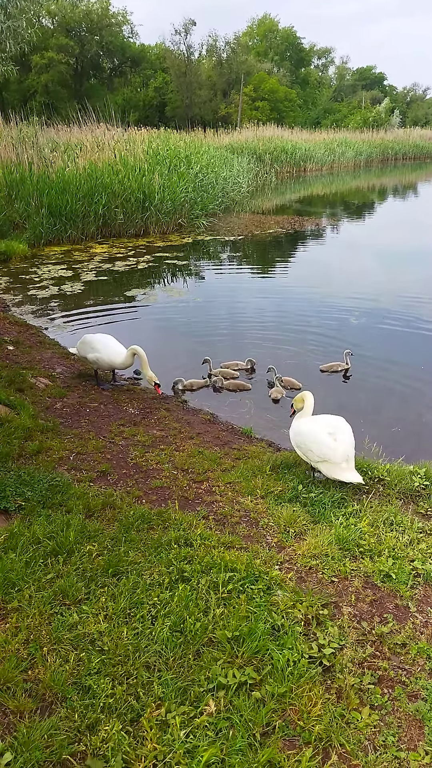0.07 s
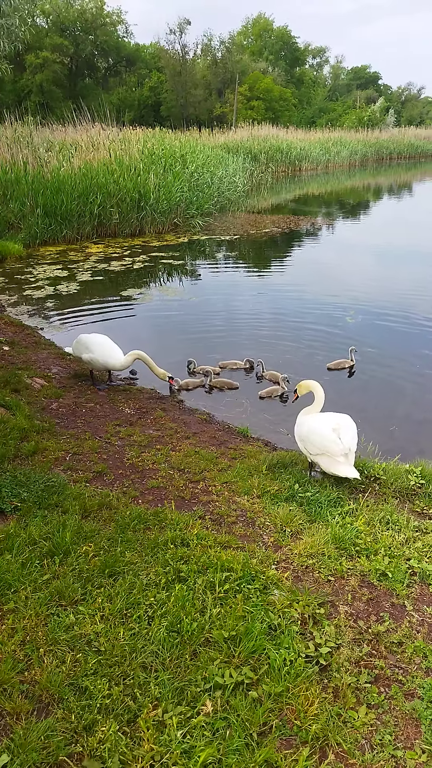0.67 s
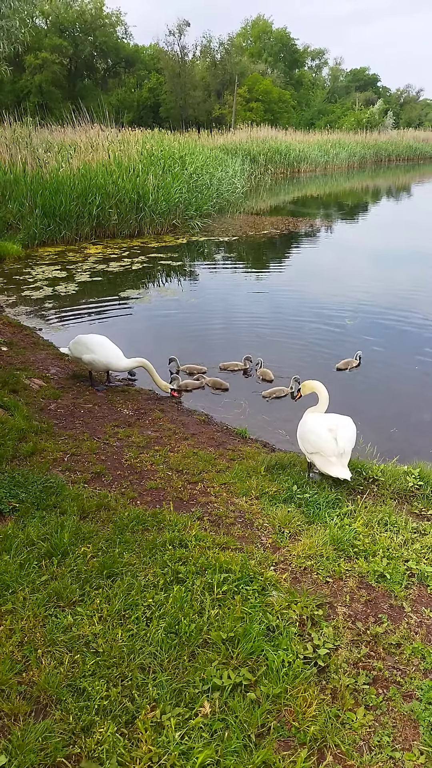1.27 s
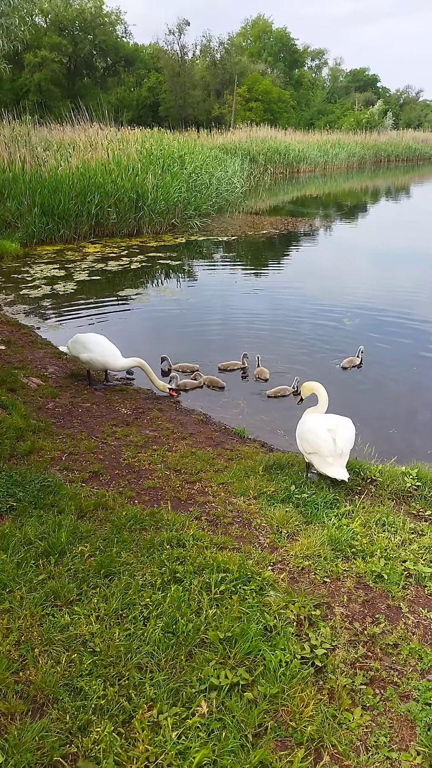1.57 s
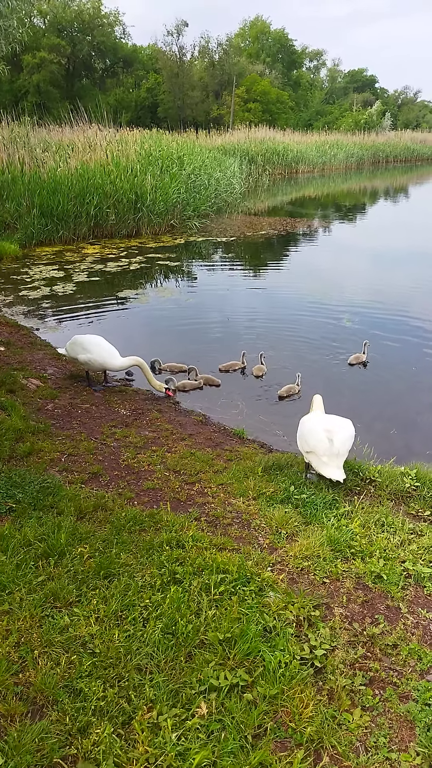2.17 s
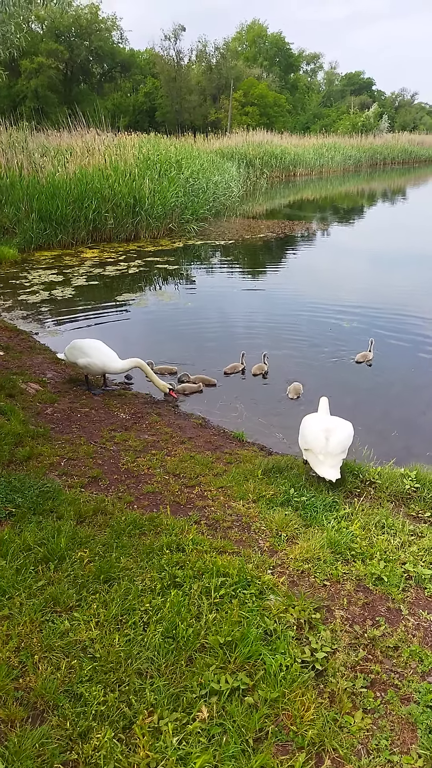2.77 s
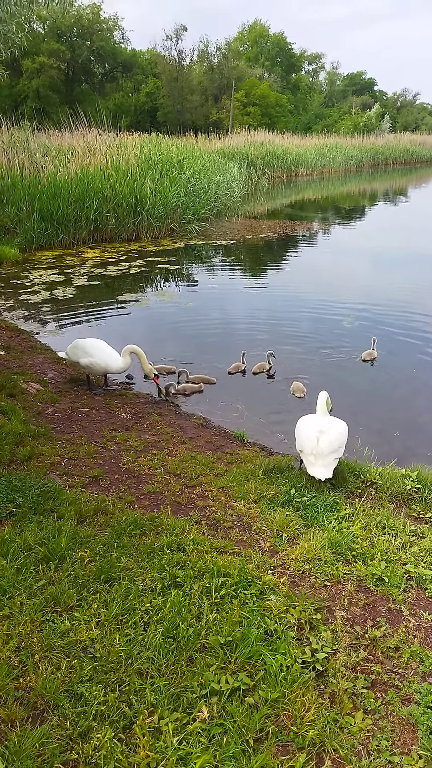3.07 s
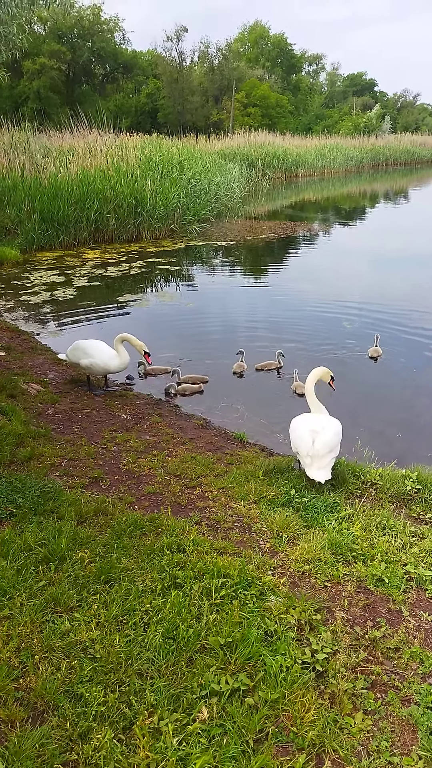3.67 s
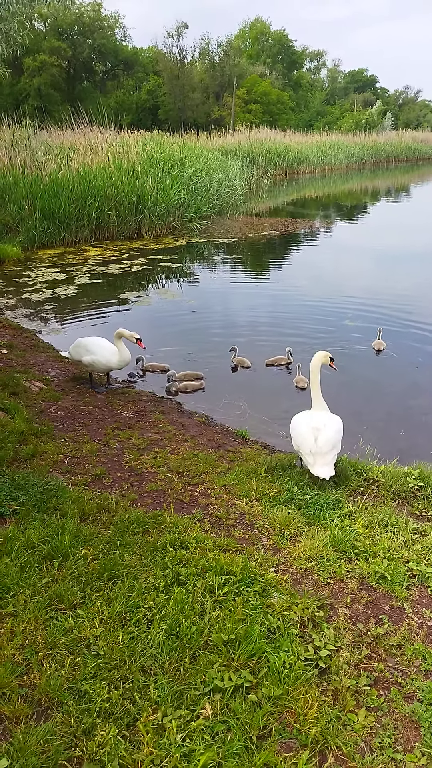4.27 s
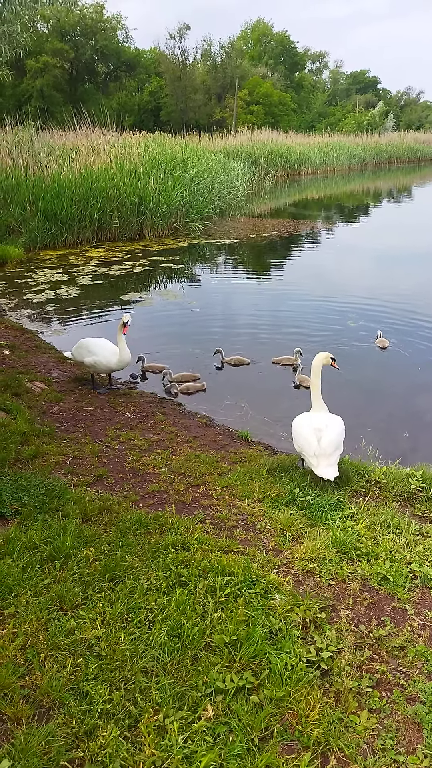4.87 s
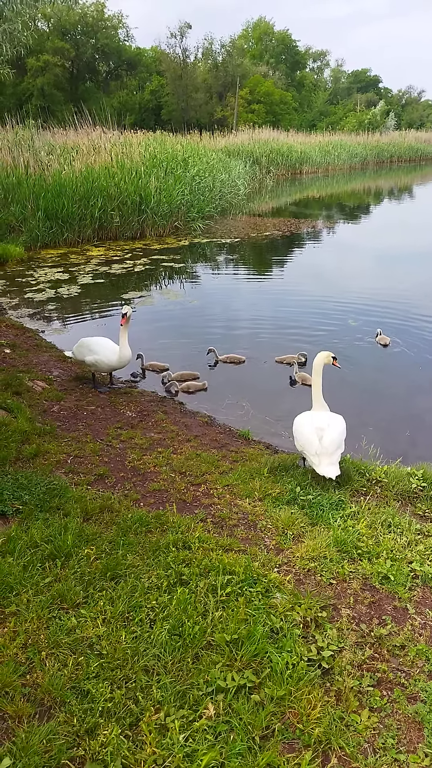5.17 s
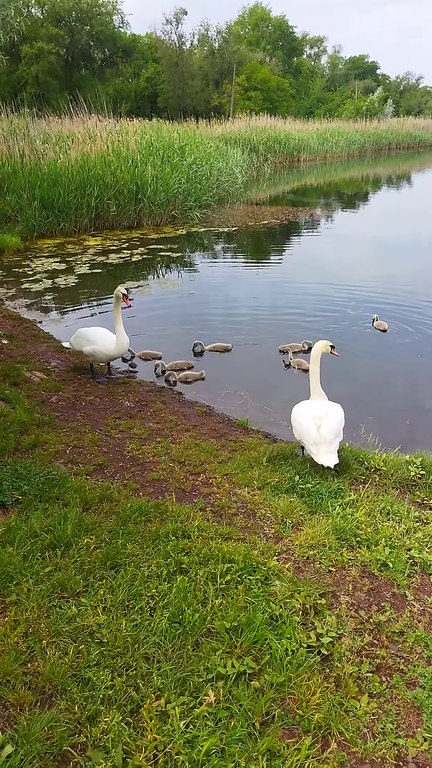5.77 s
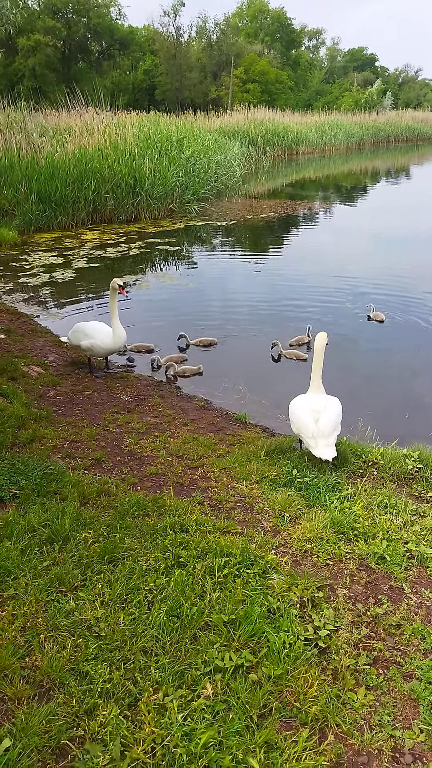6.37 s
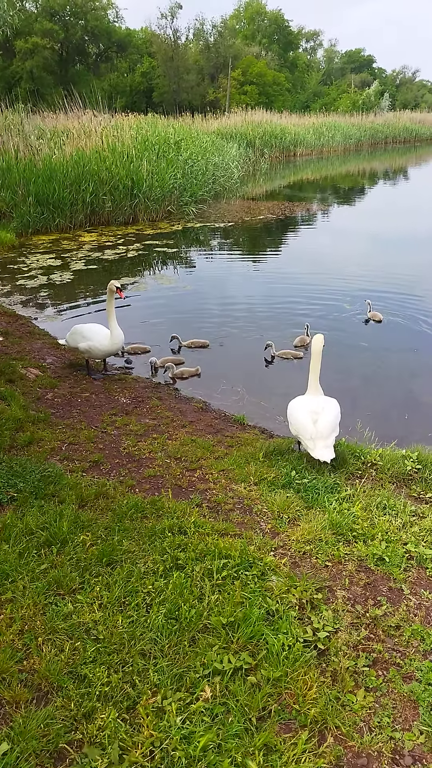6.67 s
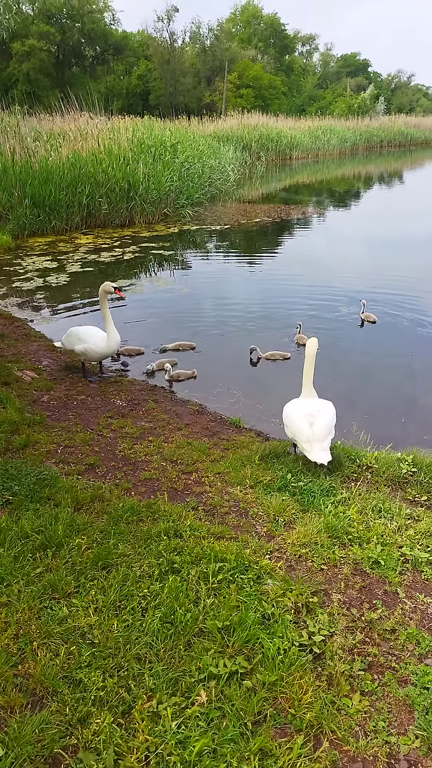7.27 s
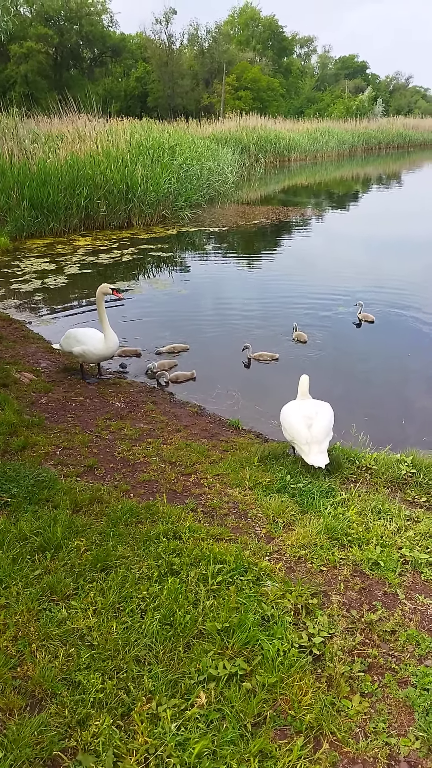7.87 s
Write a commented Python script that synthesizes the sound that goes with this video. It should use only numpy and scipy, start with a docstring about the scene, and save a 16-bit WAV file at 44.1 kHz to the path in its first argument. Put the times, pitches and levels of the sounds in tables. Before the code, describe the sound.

Swans and cygnets rasp, peep and whistle softly while dabbling in shallow water, with light wind on the microphone.

```python
"""Swans feeding at a pond

Swans and their cygnets feed by the reeds, a few metres away. The cygnets push air through
their voice boxes to whistle, peep and squeak, and dry rasps of rattling air answer. Bills tick
and drip in the shallows and stir up ringing bubbles. Birds wheeze far off, the trees give
a faint echo, and puffs of wind hit each side of the microphone over a low rumble."""
import sys
import numpy as np
from scipy import signal
from scipy.fft import rfft, irfft, next_fast_len
from scipy.io import wavfile
from scipy.ndimage import uniform_filter1d, map_coordinates

SR = 44100
rng = np.random.default_rng(int(sys.argv[2]) if len(sys.argv) > 2 else 0)


def persist_wave(psi):
    """Save psi, clipped to +-1, as 16-bit WAV."""
    counts = np.round(np.clip(psi, -1, 1) * 32767).astype(np.int16)
    wavfile.write(sys.argv[1], SR, np.atleast_2d(counts).T)


N = 349713

# How the throat boosts or weakens each overtone: frequency_hz, gain_db
THROAT_TONE = [(1500, -20), (2900, 7), (3800, 2), (4500, -8), (5750, -18), (7600, -46), (9500, -32),
               (11500, -28.5), (13400, -37), (16000, -60)]
# The tone of air hissing through the bill: frequency_hz, gain_db
HISS_TONE = [(3500, 1.5), (4500, 16), (5600, 6), (7200, -44.5), (8500, 6), (10700, 8.5), (12000, -8.5),
             (15000, 2.5)]
# One cygnet whistle a row (the base is the lowest tone, under the overtones):
# start_s, length_s, top_pitch_hz, fall_share, overtone_level_db, base_level_db, left_delay_ms
WHISTLE_NOTES = [(0.472, 0.063, 2037, .2, -64, -67.5, .55), (0.582, .06, 2075, 0.215, -60, -68.5, 0.53),
                 (.782, 0.07, 2062, 0.18, -62.5, -68.5, 0.51), (0.885, 0.069, 2080, 0.24, -63, -70, .55),
                 (3.275, 0.037, 1975, 0.024, -53.5, -80, -0.086),
                 (3.408, .055, 2003, .03, -52.5, -77, -0.084), (5.217, 0.02, 1860, 0.17, -47, -69, -.125),
                 (5.445, .108, 1908, 0.15, -40, -66, -.44), (5.578, 0.11, 1923, 0.162, -42.5, -69, -0.439),
                 (5.848, 0.1, 1926, .17, -41.5, -66, -0.45), (5.981, 0.11, 1918, .13, -45.5, -71.5, -0.45),
                 (6.267, .11, 1935, 0.21, -41.5, -69.5, -0.44),
                 (6.403, .108, 1936, 0.063, -44.5, -73.5, -0.44)]


def whistles():
    """The throat rings an octave above the base. Returns the near sound and the part sent to the trees."""
    near, thrown = np.zeros((2, 2, N))
    for start_s, length_s, top_hz, fall, db, base_db, lag_ms in WHISTLE_NOTES:
        effort = np.clip((db + 53) / 9, 0, 1)  # hard calls swoop up; soft ones only fall
        steep = 5 * min(length_s / .06, 1)
        hz, phase, swell = voice_box(length_s, top_hz, .21 * effort, fall, steep, jitter=.0044)
        u = ramp(length_s)
        n = len(u)
        edge = (2 * u - 1) ** 2  # 1 at both ends, 0 in the middle
        weak_ends = effort / (1 + (np.minimum(u, 1 - u) / .13) ** 6)
        drift = .00587 * wobble(23.3, n) + .0042 * wobble(171, n)
        drift += .03 * weak_ends * wobble(900, n)  # low pressure makes the voice rough
        phase = phase + 2 * np.pi * np.cumsum(hz * drift) / SR
        air = amp(-23.5) * noise(resonance(3630, 740), n) + amp(-29.5) * noise(tone(HISS_TONE), n)
        air += amp(-26) * wobble(702, n) * np.sin(2 * phase)  # noise clings to the octave
        air *= np.sqrt(swell) * amp(10 * edge)
        pressure = np.sqrt(swell) * amp(-7 * weak_ends)
        voice = pressure * overtones(hz, phase, THROAT_TONE, dull_db=.4 * edge) + air
        base = pressure * np.sqrt(2) * np.sin(phase)
        add(near, start_s, amp(db) * voice + amp(base_db) * base, lag_ms, pan_db=11 * lag_ms)
        add(thrown, start_s, amp(-50.5 + 6 * effort ** 2) * (voice + amp(10) * air))
    return near, thrown


# Soft calls for keeping in touch: start_s, length_s, top_pitch_hz, bend_share, level_db
PEEP_NOTES = [(0.04, 0.11, 4400, 0.042, -70), (0.361, 0.088, 2240, .07, -69),
              (0.425, 0.057, 3040, .08, -65.5), (0.867, .075, 813, 0.062, -66.5),
              (1.019, 0.082, 2540, 0.14, -66), (1.47, 0.072, 2050, 0.062, -64),
              (1.715, 0.062, 1985, 0.07, -64.5), (1.78, 0.088, 2440, 0.17, -62.5),
              (1.934, 0.097, 2810, 0.24, -61.5), (2.112, 0.07, 2810, .19, -67),
              (2.296, 0.058, 2670, .17, -67), (2.852, 0.075, 2009, 0.116, -61.5),
              (3.048, .062, 1900, 0.053, -64), (5.314, 0.042, 2210, 0.096, -63.5),
              (5.434, 0.036, 2170, 0.057, -64)]


def peeps():
    """Scratchy little notes that climb slowly and drop quickly."""
    out = np.zeros((2, N))
    for start_s, length_s, top_hz, bend, db in PEEP_NOTES:
        hz, phase, swell = voice_box(length_s, top_hz, bend, .83 * bend, 1.705, jitter=.008, late=1.3)
        scratch = amp(-11) * noise(resonance(top_hz, .27 * top_hz), len(hz))
        add(out, start_s, amp(db) * swell * (np.sin(phase) + scratch), lag_ms=-.04)
    return out


# How a nearly closed bill shapes the overtones: frequency_hz, gain_db
BILL_TONE = [(1500, -29), (3000, -5), (4450, -2.5), (5900, -10), (7400, -6), (9000, -21), (10500, -16),
             (12000, -4.5), (13500, -16), (15000, -32)]
# One squeak a row: start_s, length_s, top_pitch_hz, fall_share, level_db, dulling_db_per_overtone
SQUEAK_NOTES = [(3.215, 0.075, 1510, 0.025, -68, 1.5), (3.365, 0.065, 1530, 0.016, -66, 2),
                (5.17, 0.034, 1425, 0.087, -62, 1), (5.199, .024, 1490, .05, -55, 0.8),
                (5.233, 0.047, 1496, 0.014, -59.5, -0.37)]


def squeaks():
    """Thin notes through a nearly closed bill, flicking down at the end."""
    out = np.zeros((2, N))
    for start_s, length_s, top_hz, fall, db, dull_db in SQUEAK_NOTES:
        hz, phase, swell = voice_box(length_s, top_hz, rise=.0067, fall=fall, steep=2.9, jitter=.0046)
        air = amp(-8) * noise(resonance(4500, 2200), len(hz))
        voice = overtones(hz, phase, BILL_TONE, dull_db) + air
        add(out, start_s, amp(db) * swell * voice, lag_ms=-.2)
    return out


def voice_box(length_s, top_hz, rise, fall, steep, jitter, late=1):
    """Air pressure lifts a note's pitch and loudness together; late above 1 delays the top pitch."""
    u = ramp(length_s)
    n = len(u)
    slack = np.abs(2 * u - 1)
    lean = 2 * u ** late - 1
    droop = np.where(lean < 0, rise, fall) * np.abs(lean) ** steep
    droop += .0395 * np.maximum(u - .45, 0)  # the pitch sags as air runs out
    hz = top_hz * (1 - droop + jitter * (wobble(581, n) + wobble(81.8, n)))
    flicker_db = (1 + 2 * slack ** 2) * wobble(235, n)
    swell = amp(-10 * slack ** 5 + flicker_db) * np.clip(14 * (1 - slack), 0, 1)
    return hz, 2 * np.pi * np.cumsum(hz) / SR, swell


def overtones(hz, phase, body, dull_db):
    """Tones at 2 to 9 times the pitch, shaped by the throat or bill; the upper ones flicker."""
    out = np.zeros(len(hz))
    for k in range(2, 10):
        flicker_db = (k > 2) * 2 * wobble(144, len(hz))
        out += amp(along(body, k * hz) + flicker_db - (k - 2) * dull_db) * np.sin(k * phase)
    return np.sqrt(2) * out


# Runs of dry rasps: start_s, rasp_count, spacing_s, length_s, level_db, force_0_to_1, pips_per_rasp
RASP_RUNS = [(.008, 1, 0, 0.028, -55, 0, 0), (.131, 1, 0, 0.077, -51, 0, 0),
             (0.226, 2, .055, 0.027, -53, 0.26, 0), (1.158, 2, .15, 0.059, -52, 0.2, 0),
             (1.517, 2, .157, 0.063, -53, 0.28, 0), (3.679, 2, .148, 0.026, -47.5, 0.77, 2),
             (4.066, 2, .143, 0.034, -48.5, 0.86, 2), (4.413, 1, 0, 0.15, -49.5, 0.62, 0),
             (4.639, 1, 0, .15, -48.5, .78, 0), (4.889, 1, 0, 0.15, -48, 0.79, 0),
             (5.392, 1, 0, 0.026, -55.5, 0.9, 0), (6.215, 1, 0, 0.027, -57.5, 0.97, 0)]


def rasps():
    """Rasps come alone or in pairs; tiny pips lead into some of the short ones."""
    out = np.zeros((2, N))
    for first_s, count, spacing_s, length_s, db, force, pips in RASP_RUNS:
        for start_s in first_s + spacing_s * np.arange(count):
            call = amp(db) * rasp(length_s, force)
            out[:, round(start_s * SR):][:, :call.shape[1]] += call
            for k in range(pips):  # earlier pips are weaker
                _, phase, swell = voice_box(.012, 2680, rise=.1, fall=.042, steep=.97, jitter=.0093)
                add(out, start_s - .016 - .0207 * k, amp(db - 7 - 8 * k) * swell * np.sin(phase))
    return out


def rasp(length_s, force):
    """Air rattles through the throat in uneven puffs; force deepens the rattle and raises its ring."""
    u = ramp(length_s)
    n = len(u)
    out = np.zeros((2, n))
    centre_hz, puffs_per_s, puff_fade_db = 2432 + 641 * force, 86, 5 + 5 * force
    cycle = np.cumsum(puffs_per_s * np.exp(.25 * wobble(90, n))) / SR
    sizes_db = 2.5 * rng.standard_normal(64)[cycle.astype(int)]
    rattle = unit(uniform_filter1d(amp(sizes_db - puff_fade_db * (cycle % 1)), size=40))
    arch = np.abs(np.sin(np.pi * u))
    flow = rattle * arch ** (.12 + .25 * force)
    ring_hz = centre_hz * (1 + .1 * (u - .5) + .025 * wobble(54.2, n))  # climbs and wanders
    grain = wobble(380, n) + 1j * wobble(380, n)  # blurs the ring into a narrow band of noise
    ring = unit(np.real(grain * np.exp(2j * np.pi * np.cumsum(ring_hz) / SR)) * np.sqrt(arch))
    swell_db = 40 * length_s * (2 * arch ** 2 - 1.4)  # longer rasps swell more in the middle
    ring *= amp(swell_db - 2 - 10.5 * (1 - force))
    low_cut = lambda f: 1 + (.69 * centre_hz / (f + 1)) ** 8
    high_cut = lambda f: 1 + (f / (1.38 * centre_hz)) ** 20
    breath = amp(-6.5) * noise(lambda f: 1 / np.sqrt(low_cut(f) * high_cut(f)), n)
    add(out, 0, flow * (ring + breath), lag_ms=-.04 - .18 * force)
    for pan_db in (-20, 20):  # part scatters off the water, differently to each side
        hiss = amp(-36.5 + 12.5 * force) * noise(tone(HISS_TONE), n)
        scatter = amp(-18) * noise(resonance(centre_hz, 900), n)
        add(out, 0, flow * (hiss + scatter), pan_db=pan_db)
    return out


# The clearest ticks of bills in the water: start_s, peak_db, pitch_hz, crack_share_db
BILL_SPLASHES = [(0.123, -45.5, 2333, -2), (0.1866, -46, 2390, -2.5), (.661, -40.5, 4130, .5),
                 (.738, -42, 4800, 2), (.963, -50.5, 3000, -11), (1.12, -45, 9600, -6),
                 (1.245, -46.5, 2780, -2), (1.9148, -49.5, 920, -5), (2.096, -46, 2500, -4),
                 (2.201, -50, 1140, -12), (2.4932, -45.5, 3270, .5), (2.888, -53, 1740, -24),
                 (3.036, -44, 1940, -2.5), (4.0174, -45.5, 2765, 0), (5.333, -52.5, 7240, -7),
                 (7.3558, -48.5, 3280, -15), (7.4091, -42.5, 2800, -1), (7.749, -45.5, 2980, 0),
                 (7.87, -44, 12300, -2), (7.899, -44, 12400, -3)]


def dabbling():
    """Bills nibble at the water's edge and shed droplets, among fainter drips; then they churn bubbles."""
    out = np.zeros((2, N))
    lowest_drip_hz, churn_start_s, churn_length_s = 1310, 7.33, .57
    for start_s, db, hz, crack_db in BILL_SPLASHES:
        pan_db = rng.normal(-1.6, 4.3)
        add(out, start_s, amp(db) * splash(hz, crack_db), pan_db=pan_db)
        for wait, pitch, size in rng.random((2, 3)):
            droplet = amp(db - 10.5 - 3.7 * size) * splash(lowest_drip_hz * 8 ** pitch, crack_db=-6)
            add(out, start_s - .03 * np.log(1 - wait), droplet, pan_db=pan_db)
    for when, pitch, size, side in rng.random((110, 4)):
        start_s = when * N / SR
        range_db = 9.5 if start_s < 3.1 else 4.75  # drips soften when the feeding eases
        drip = splash(lowest_drip_hz * 8 ** pitch, -9 * (1 - pitch))  # higher drips crack more
        add(out, start_s, amp(-57 + range_db * size ** 3) * drip, lag_ms=.12 * (side - .5))
    t = np.arange(SR // 16) / SR
    for when, pitch, size, side in rng.random((70, 4)):
        hz = 1860 * np.exp(.2 * np.arctanh(1.99 * (pitch - .5)))
        bubble = np.sin(2 * np.pi * hz * t * (1 + t))  # the pitch rises as it surfaces
        bubble *= fade(t, .094) * (1 - np.exp(-t / .0003))
        spray = amp(8.5) * splash(12000, crack_db=-9)
        churn = amp(-71.5 + 7.2 * size ** 2) * (bubble + spray)
        add(out, churn_start_s + churn_length_s * when, churn, lag_ms=.067 * (side - .5))
    return out


# The tone of a small splash's sharp crack: frequency_hz, gain_db
CRACK_TONE = [(1500, -14), (4000, 6.5), (7000, 5), (9500, 6.5), (15000, 1.5)]


def splash(hz, crack_db):
    """A tiny splash with a peak of 1: a sharp crack and a brief ring that lasts longer when low."""
    t = np.arange(SR // 16) / SR
    ring = noise(resonance(hz, 500 + .3 * hz), len(t)) * fade(t, .015 * (2800 / hz) ** .45)
    crack = noise(tone(CRACK_TONE), len(t)) * fade(t, .006)
    share = min(amp(crack_db), .97)
    x = np.sqrt(1 - share ** 2) * ring + share * crack
    return x / np.abs(x).max()


# Plops and ringing bubbles: start_s, peak_db, pitch_hz, fade_s
BUBBLE_PLOPS = [(1.4168, -41.5, 2690, 0.012), (7.337, -56, 1800, .03), (7.417, -47.5, 2560, 0.015),
                (7.439, -57, 976, 0.047), (7.55, -48, 2110, 0.017), (7.63, -55, 1850, .06),
                (7.656, -51, 2110, 0.021), (7.698, -60.5, 2240, 0.088), (7.715, -61, 1695, .13),
                (7.821, -58, 1920, 0.11), (7.849, -42, 2380, 0.012)]


def plops():
    """Trapped air rings and climbs in pitch as it surfaces, short plops fastest."""
    out = np.zeros((2, N))
    t = np.arange(SR // 8) / SR
    for start_s, db, hz, fade_s in BUBBLE_PLOPS:
        ring = np.sin(2 * np.pi * hz * t * (1 + .0043 * t / fade_s ** 2))
        ring *= fade(t, fade_s) * (1 - np.exp(-t / .00016))
        add(out, start_s, amp(db) * ring / np.abs(ring).max())
    return out


# Wheezes of far birds: start_s, length_s, pitch_hz, width_hz, relative_level_db
FAR_WHEEZES = [(0.454, 0.12, 4600, 696, -74), (0.529, 0.17, 4200, 900, -71.5),
               (1.342, 0.27, 4050, 604, -80), (2.376, 0.39, 3900, 1140, -80),
               (2.846, 0.36, 2320, 300, -78.5), (3.831, 0.1, 4750, 2200, -75.5),
               (5.675, 0.27, 3820, 1320, -66.5), (5.745, 0.086, 6440, 887, -76.5)]


def far_birds():
    """Distant wheezy notes: a band of noise swells and fades, separately on each side."""
    out = np.zeros((2, N))
    for start_s, length_s, hz, width_hz, db in FAR_WHEEZES:
        u = ramp(length_s)
        swell = amp(db - 1.5) * np.abs(np.sin(np.pi * u ** .88)) ** .51
        for lag_ms, pan_db in ((-.25, -22), (-.1, 23.5)):
            add(out, start_s, swell * noise(resonance(hz, width_hz), len(u)), lag_ms, pan_db)
    return out


# The tone of wind on the microphone at a speed of 1 (slower is darker): frequency_hz, gain_db
WIND_TONE = [(20, -64), (35, -31), (60, -13), (100, 2.5), (150, 1.5), (250, -6), (380, -20.5), (520, -33.5),
             (1200, -94)]
# The breeze over time: time_s, level_db, left_minus_right_db
BREEZE_LEVELS = [(.1, -74, -2), (.42, -51.5, -11.5), (.9, -51.5, 6.5), (1.15, -57, -17), (1.7, -56.5, 1.5),
                 (1.85, -77.5, 6), (5.85, -69.5, 7), (6.449, -41, 15.5), (7.05, -45.5, -17),
                 (7.62, -48, -11), (7.88, -67, -2)]
# The strongest puffs: middle_s, loud_part_s, relative_level_db, side (0 left, 1 right)
WIND_PUFFS = [(.385, 0.028, -44, 1), (.439, 0.019, -38.5, 1), (.669, 0.019, -38, 0),
              (.822, 0.021, -41.5, 0), (.888, 0.044, -44, 1), (1.129, 0.023, -44, 1),
              (6.015, 0.037, -41.5, 1), (6.264, 0.035, -24, 0), (6.419, 0.055, -35, 1),
              (6.505, 0.054, -35, 0), (6.585, 0.0204, -35.5, 0), (6.849, 0.057, -33, 1),
              (6.931, 0.025, -35, 0), (7.245, .04, -40, 1), (7.581, 0.055, -37, 0)]


def wind():
    """Two lumpy gusts veer across the microphone; single puffs hit one side, brighter when stronger."""
    times_s, levels_db, leans_db = np.transpose(BREEZE_LEVELS)
    level_db, lean_db = over_time(times_s, levels_db), over_time(times_s, leans_db)
    out = np.zeros((2, N))
    for side, sign in enumerate((1, -1)):
        breeze = noise(tone(WIND_TONE, speed=.86), N)
        lumps = amp(6 * np.minimum(wobble(22), 1.5))  # swirls within the breeze
        out[side] = amp(level_db + sign * lean_db / 2) * unit(breeze * lumps)
    for middle_s, loud_part_s, db, side in WIND_PUFFS:
        u = ramp(1.6 * loud_part_s)
        rush = noise(tone(WIND_TONE, speed=amp(.21 * (db + 33))), len(u))
        puff = unit(rush * np.sin(np.pi * u) ** 2)
        slot = out[side, round(middle_s * SR) - len(u) // 2:][:len(u)]
        slot += amp(db - .5) * puff[:len(slot)]
    return out


# The tone of still outdoor air: frequency_hz, gain_db
AIR_TONE = [(25, -50), (45, -28), (77, -11), (117, 0.5), (187, -10.5), (546, -19), (1500, -25),
            (2700, -27.5), (4300, -29), (6500, -35), (7100, -41.5), (11500, -36.5), (15500, -38)]
# The tone of rustling reeds: frequency_hz, gain_db
REED_TONE = [(900, -12.5), (1700, -1.5), (2500, 3), (4200, -2), (5400, -26), (8000, -15.5)]
# How loudly the reeds rustle: time_s, level_db
REED_LEVELS = [(0, -69), (1.5, -69.5), (2.1, -70.5), (4, -69.5), (5.7, -69), (6.9, -80), (7.93, -69.5)]


def background():
    """Reeds stir in the quiet air while a low, far-off rumble swells and fades."""
    reeds = amp(over_time(*np.transpose(REED_LEVELS)) + 1.4 * wobble(9)) * outdoor_noise(REED_TONE)
    swell = amp(over_time([2, 3.5, 5.5], [-69, -62, -66]))
    rumble = np.array([noise(resonance(141.6, 47), N) for side in range(2)])
    return amp(-61.5) * outdoor_noise(AIR_TONE) + swell * rumble + reeds


# How alike left and right sound: frequency_hz, likeness (1 the same, 0 unrelated, -1 opposite)
SIDE_LIKENESS = [(100, 1), (500, 0.43), (2000, -0.16), (4000, -0.15), (12000, -0.033)]


def outdoor_noise(colour):
    """Noise from all around; its lowest tones reach both sides alike."""
    turn = lambda f: np.arccos(along(SIDE_LIKENESS, f)) / 2
    gains = lambda f: amp(along(colour, f)) * [np.cos(turn(f)), np.sin(turn(f))]
    shared, opposed = filtered(rng.standard_normal((2, N)), gains)
    return unit(np.array([shared + opposed, shared - opposed]))


def echo(x, fade_s, level_db):
    """Many small reflections blur into a tail that dies away."""
    t = np.arange(SR) / SR
    tail = rng.standard_normal((2, SR)) * fade(t, fade_s) * (1 - np.exp(-t / .0019))
    return amp(level_db) * signal.fftconvolve(x, tail / np.linalg.norm(tail[0]), axes=1)[:, :N]


def amp(db):
    """Turn decibels into a number to multiply by."""
    return 10 ** (np.asarray(db) / 20)


def fade(t, fade_s):
    """A level that drops 60 dB in fade_s seconds."""
    return amp(-60 * t / fade_s)


def unit(x):
    """Scale a sound to an average strength (rms) of 1."""
    return x / np.sqrt(np.mean(x ** 2) + 1e-20)


def ramp(length_s):
    """A straight climb from 0 to 1."""
    return np.linspace(0, 1, max(int(length_s * SR), 64))


def over_time(times_s, values):
    """Join points in time with straight lines."""
    return np.interp(np.arange(N) / SR, times_s, values)


def along(points, hz):
    """Read a table between its frequencies, with every octave equally wide."""
    frequencies, values = np.transpose(points)
    return np.interp(np.log(hz + 1), np.log(frequencies + 1), values)


def tone(points, speed=1):
    """Turn a tone table into a filter; speed multiplies its frequencies."""
    return lambda f: amp(along(points, f / speed))


def resonance(centre_hz, width_hz):
    """A filter that favours one pitch, like two matching resonators in a row."""
    return lambda f: 1 / (1 + ((f * f - centre_hz ** 2) / (f * width_hz + 1)) ** 2)


def wobble(per_s, size=N):
    """A smooth curve through per_s random points a second."""
    points = rng.standard_normal(int(size * per_s / SR) + 4)
    return map_coordinates(points, [np.arange(size) * per_s / SR])


def filtered(x, gain):
    """Multiply each frequency f in a sound by gain(f)."""
    n = x.shape[-1]
    padded = next_fast_len(n + 1024)
    return irfft(rfft(x, padded) * gain(np.fft.rfftfreq(padded, 1 / SR)), padded)[..., :n]


def noise(gain, size):
    """Filtered noise with a strength of 1."""
    return unit(filtered(rng.standard_normal(size), gain))


def add(out, start_s, x, lag_ms=0, pan_db=0):
    """Mix a sound in, with the left side lag_ms later and pan_db louder than the right."""
    for side, sign in enumerate((1, -1)):
        delay_s = sign * lag_ms / 2000
        part = filtered(np.pad(x, (0, 32)), lambda f: np.exp(-2j * np.pi * f * delay_s))
        slot = out[side, max(round(start_s * SR), 0):][:len(part)]
        slot += amp(sign * pan_db / 2) * part[:len(slot)]


def scene():
    """Birds and water in the open air; the bank and ripples scatter the calls at once, the trees later."""
    whistling, thrown = whistles()
    peeping, squeaking, rasping = peeps(), squeaks(), rasps()
    water = dabbling() + plops()
    far = far_birds()
    calls = whistling + peeping + squeaking + rasping
    bank = echo(calls, fade_s=.035, level_db=-11)
    bright_squeaks = amp(12) * filtered(squeaking, resonance(4450, 1800))
    toward_trees = thrown + peeping + bright_squeaks + amp(4) * rasping + amp(1) * water
    trees = echo(toward_trees, fade_s=.85, level_db=-15) + echo(far, fade_s=.83, level_db=-3.5)
    return calls + water + far + bank + trees + wind() + background()


def record(dry):
    """The recorder keeps nothing above 15830 Hz."""
    return filtered(dry, lambda f: f < 15830)


dry = scene()
out = record(dry)
persist_wave(out)
```